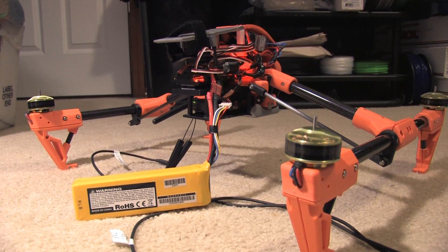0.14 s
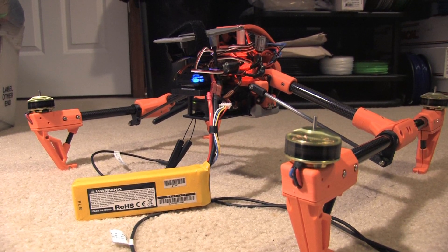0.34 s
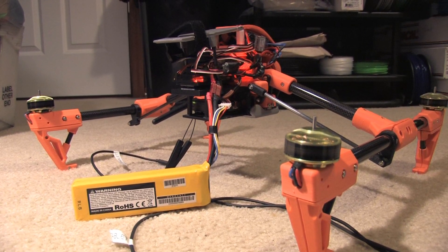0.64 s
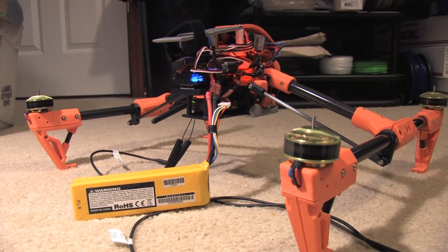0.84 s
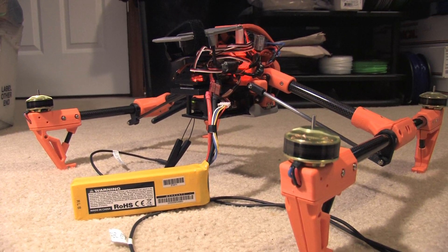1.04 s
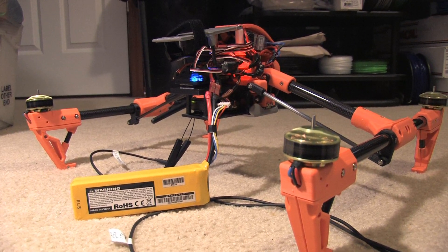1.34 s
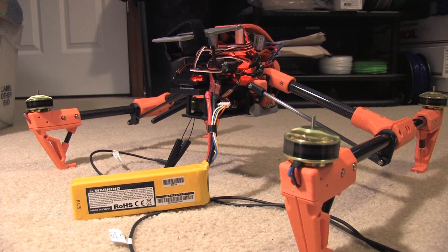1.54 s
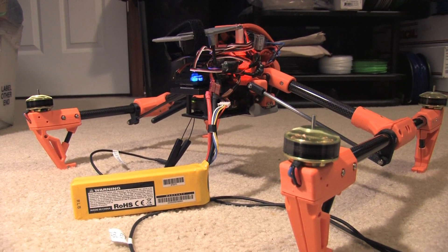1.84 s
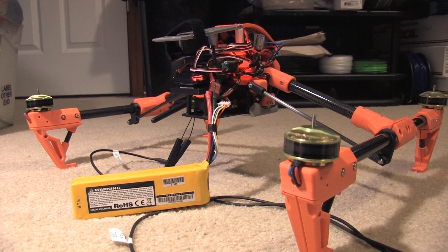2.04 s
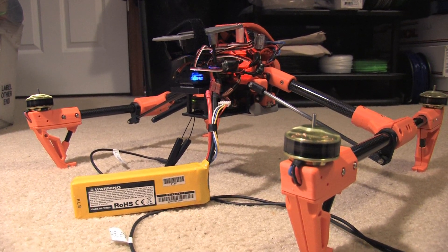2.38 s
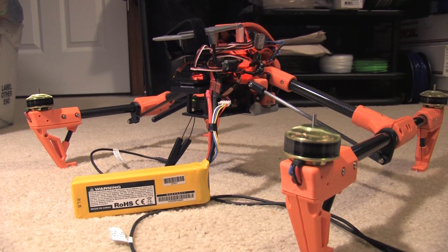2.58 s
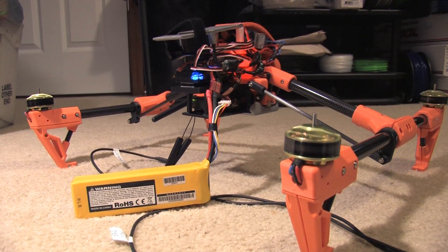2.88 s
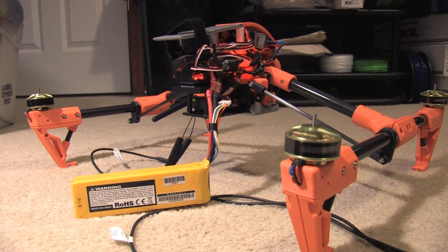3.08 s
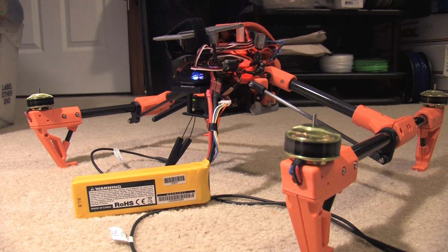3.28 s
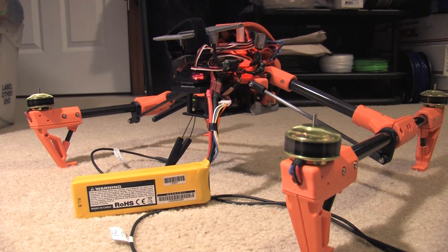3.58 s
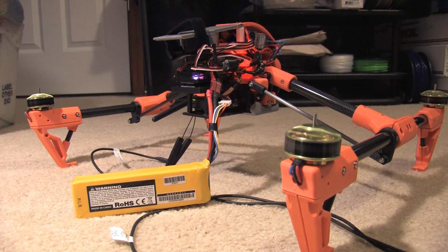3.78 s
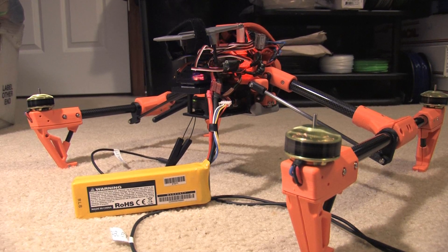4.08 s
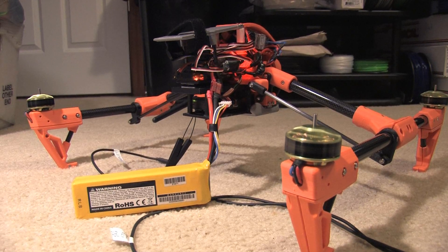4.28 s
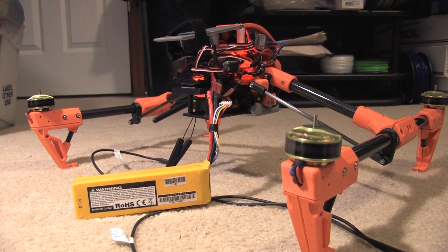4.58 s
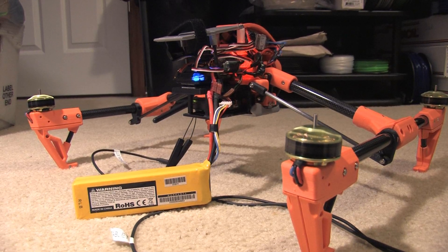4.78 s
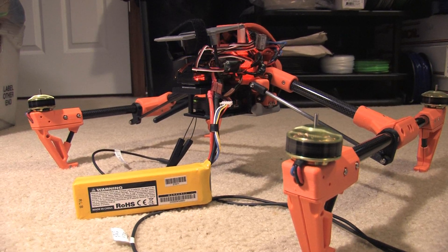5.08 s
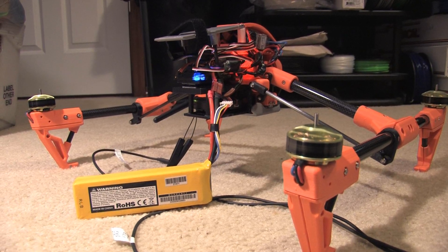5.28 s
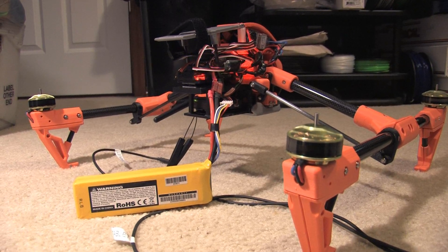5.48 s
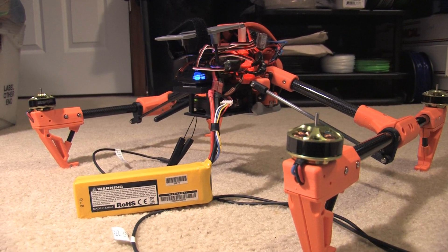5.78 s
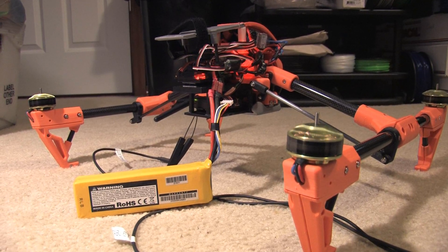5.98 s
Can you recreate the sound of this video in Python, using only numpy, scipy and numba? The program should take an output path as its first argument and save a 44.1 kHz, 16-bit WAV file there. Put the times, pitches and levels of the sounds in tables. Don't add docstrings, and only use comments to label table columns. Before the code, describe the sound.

Several small brushless motors without propellers whine piercingly close to the microphone, sag in pitch, surge back to full speed, then glide down to a stop. Dull room noise and faint hum remain, with a soft thud. A whistling kick spins them up again; a knock comes near the top, they coast down, and another start begins at the very end.

```python
import sys
import numpy as np
from scipy import signal
from scipy.fft import rfft, irfft
from scipy.io import wavfile
from scipy.ndimage import map_coordinates
from numba import njit

SR = 44100
rng = np.random.default_rng(int(sys.argv[2]) if len(sys.argv) > 2 else 0)


def voltage_ratio(decibels):
    exponent = np.asarray(decibels, float) / 20
    return 10 ** exponent


def bounce(signal):
    frames = np.transpose(np.atleast_2d(signal))
    limited = np.clip(frames, -1, 1)
    pcm = np.round(limited * 32767).astype(np.int16)
    wavfile.write(sys.argv[1], SR, pcm)


N = 270333
HOP = 32
TIME = np.arange(N // HOP + 2) * HOP / SR
TOP_HZ = 162
SWITCH_HZ = 9135


def fine(control):
    return np.interp(np.arange(N) / SR, TIME, control)


def walk(rate):
    count = int(N / SR * rate) + 3
    return np.interp(TIME, np.arange(count) / rate, 1.2 * rng.standard_normal(count))


def band(x, low_hz, high_hz):
    sos = signal.butter(4, [low_hz, high_hz], "bandpass", fs=SR, output="sos")
    y = signal.sosfilt(sos, x)
    return y / np.std(y)


def colour(x, points, rings=()):
    hz = np.arange(1, 8194) * SR / 16384
    point_hz, point_db = np.array(points).T
    gain = voltage_ratio(np.interp(np.log(hz), np.log(point_hz), point_db))
    for ring_hz, width_hz, db in rings:
        gain = gain * (1 + (voltage_ratio(db) - 1) / (1 + (2 * (hz - ring_hz) / width_hz) ** 2))
    cepstrum = irfft(np.log(np.abs(gain) + 1e-9))
    cepstrum[1:8192] *= 2
    cepstrum[8193:] = 0
    response = irfft(np.exp(rfft(cepstrum)))
    return signal.fftconvolve(x, response[None], axes=1)[:, :N]


@njit
def add(out, hz, size, left, turn, skew):
    for i in range(out.shape[1]):
        k, part = i // HOP, i % HOP / HOP
        turn += 2 * np.pi * (hz[k] + part * (hz[k + 1] - hz[k])) / SR
        gain = size[k] + part * (size[k + 1] - size[k])
        out[0, i] += gain * left * np.sin(turn + skew)
        out[1, i] += gain / left * np.sin(turn)


# (frequency [Hz], level [dB per Hz])
ROOM = [(15, -24), (25, -10.5), (69, -21), (155, -20.5), (363, -21.5), (430, -25), (489, -23.5), (763, -39),
        (4000, -81), (5200, -103), (8800, -120)]


def room_air(speed):
    shared = rng.standard_normal(N) * np.array([[1], [-1]])
    air = colour(rng.standard_normal((2, N)) + 0.5 * shared, ROOM)
    duck_db = -7 * np.clip((speed - 32) / 10, 0, 1)
    return air * fine(voltage_ratio(-63.5 + duck_db + 1.1 * walk(4.5))) / np.std(air)


# (frequency [Hz], level [dB])
HUM = [(150.7, -72.5), (4797, -105), (5098, -98), (5254, -99), (5399, -94), (5696, -106.5), (6298, -102),
       (6595, -107)]


def hum():
    out = np.zeros((2, N))
    for hz, db in HUM:
        add(out, hz + 0 * TIME, np.sqrt(2) * voltage_ratio(db + 1.0 * walk(27)), 1., 0., .3)
    return out


# (time [s], level [dB], frequency [Hz])
BUMPS = [
    (0.019, -68, 167),
    (0.35, -50, 121),
    (1.449, -67, 38.7),
    (2.917, -48, 43.4),
    (3.999, -34.5, 137.4),
    (5.247, -47.5, 130),
    (5.719, -63, 51.04),
]


def bumps():
    out = np.zeros(N)
    for start_s, db, hz in BUMPS:
        age = np.maximum(np.arange(N) / SR - start_s, 0)
        swell = np.e * age / 0.036 * np.exp(-age / 0.013)
        out += voltage_ratio(db) * swell * np.sin(2 * np.pi * hz * age)
    return out


def floor_shake(speed):
    db = -62 + 4.9 * np.log2(speed / TOP_HZ) + 2 * walk(0.7)
    return fine(voltage_ratio(db)) * band(rng.standard_normal((2, N)), 30, 140)


def surge(speed):
    return np.exp(-((speed - 119.6) / 11.6) ** 2)


# (time [s], speed asked for [Hz])
STICK = [
    [(0, 162), (.041, 162), (.211, 146.8), (.399, 121.8), (.725, 78), (.894, 78.8), (1.014, 101.6),
     (1.024, 162), (1.474, 162), (1.751, 137.4), (1.993, 105.8)],
    [(3.27, 162), (3.865, 162), (4.499, 106.5), (4.687, 81.7)],
    [(6.0, 162), (6.2, 162)],
]


def rotor():
    friction_hz_s, drag_per_s = 56.9, .556
    push_hz_s, kick_hz_s, kick_under_hz, surge_hz_s = 281, 160, 25, 244
    follow_s, rest_hz = .029, 2
    asked = sum(np.interp(TIME, *np.transpose(rows), left=0, right=0) for rows in STICK)
    speed, now = np.empty(len(TIME)), TOP_HZ
    for i, goal in enumerate(asked):
        speed[i] = now
        pull = push_hz_s + kick_hz_s * np.exp(-now / kick_under_hz) + surge_hz_s * surge(now)
        slowing = -friction_hz_s - drag_per_s * now
        climb = min(max((goal - now) / follow_s, slowing), pull)
        now = max(now + climb * HOP / SR, rest_hz)
    return speed


# (time [s], switching whistle level [dB])
STARTS = [
    (3.269, -20.5),
    (6.001, -19),
]


def current(speed):
    hold_hz_s, full_hz_s, ease_off = 208, 320, 6.3
    align_s, align_db, onset_db, onset_s = .031, -7, -12, .005
    climb = np.gradient(speed, TIME)
    hold = hold_hz_s * (speed / TOP_HZ) ** 1.2 * (speed > 70)
    effort = hold + climb * np.where(climb < 0, ease_off, 1)
    db = 20 * np.log10(np.maximum(effort / full_hz_s, 1e-3))
    for start_s, _ in STARTS:
        aligning = (TIME > start_s) * (TIME < start_s + align_s)
        db = db + (align_db + onset_db * np.exp(-np.abs(TIME - start_s) / onset_s)) * aligning
    return db


def switching(speed):
    db = np.full(len(TIME), -120.)
    for start_s, top_db in STARTS:
        rise_db = -12 * np.clip(1 - (TIME - start_s) / 0.062, 0, 1)
        fade_db = 1.627 * np.maximum(speed - 34, 0)
        starting = (TIME > start_s) & (TIME < start_s + .5)
        db = np.where(starting, top_db + rise_db - fade_db, db)
    return db


# (frequency [Hz], level [dB])
WIDE = [(100, 4.5), (400, -5), (2000, -11.5), (4000, -9.5), (7000, -0.5), (15000, -8)]
# (from [Hz], to [Hz], level [dB], knee speed [Hz],
# loss under the knee [dB per octave], buzz at full current [dB])
RUSTLE = [(120, 540, -37, 90, 29, -46.5), (602, 1300, -27.5, 111, 24.5, -42),
          (680, 1870, -55.5, 9, 12, -58.5), (1404, 2600, -33, 39, 20, -39),
          (2798.1, 3900, -33, 65, 38.5, -37.5), (3550, 4114, -49, 53, 24.5, -35.5),
          (4280, 8500, -18, 109.2, 49.5, -35), (7820, 8400, -61.5, 50, 18.5, -55),
          (9650, 11000, -46.5, 130, 37.5, -35.5), (13000, 16000, -26, 138, 49, -36.5)]


def rustle(speed, current_db):
    throb = 1 + 0.24 * np.sin(2 * np.pi * np.cumsum(fine(speed)) / SR)
    grit = voltage_ratio(1.85 * np.repeat(rng.standard_normal(N // 32 + 1), 32)[:N]) * throb
    noise = grit * rng.standard_normal((2, N))
    noise = noise[0] + colour(noise[1:], WIDE) * np.array([[1.3], [-1.3]])
    full_on = np.clip((speed - 155) / 5, 0, 1) * np.minimum(voltage_ratio(current_db + 10), 1)
    buzz_loss_db = np.minimum(.88 * current_db, .5 * current_db)
    out = 0
    for low, high, db, knee, loss_db, buzz_db in RUSTLE:
        spin = voltage_ratio(db - loss_db * np.log2(1 + (knee / speed) ** 2) / 2)
        buzz = voltage_ratio(buzz_db + buzz_loss_db)
        hush_db = (low > 12000) * -12 * full_on
        size = np.hypot(spin, buzz) * voltage_ratio(hush_db + 2.2 * walk(14))
        out = out + fine(size) * band(noise, low, high)
    return out


def bell_db(hz):
    valleys = 17 * np.exp(-((hz - 6200) / 2100) ** 4) + 11 * np.exp(-((hz - 11300) / 1600) ** 4)
    return 15 / (1 + ((hz - 3800) / 260) ** 2) - np.maximum(3500 - hz, 0) / 30 - valleys


# (from [shaft multiple], to [shaft multiple], level at top speed [dB],
# loss [dB per octave of speed])
RACES = [(10.64, 15.5, -49, -3), (22, 45, -43.5, 4), (32.4, 43, -50.5, 3), (45, 95, -59.5, -4),
         (96, 102, -47, 8.5)]


def races(speed):
    place = 2 * np.cumsum(fine(speed)) / TOP_HZ
    stall_db = 30 * np.log10(1 + (9 / speed) ** 2)
    out = 0
    for low, high, db, loss_db in RACES:
        track = band(rng.standard_normal(2 * N), low * TOP_HZ / 2, high * TOP_HZ / 2)
        ring_db = (low > 80) * bell_db((low + high) / 2 * speed)
        size = voltage_ratio(db + loss_db * np.log2(speed / TOP_HZ) - stall_db + ring_db + 2.5 * walk(20))
        out = out + fine(size) * map_coordinates(track, [place], order=3)
    return signal.sosfilt(signal.butter(4, 620, "highpass", fs=SR, output="sos"), out)


# (shaft multiple [-], level at top speed [dB], loss [dB per octave of speed])
COAST = [(1.005, -42, 12), (2.09, -49, 14), (3.12, -41, 15.5), (9.41, -46, 33), (15.2, -44.5, 9.5),
         (16.18, -43.5, 12), (22.6, -53, 3), (49, -51, 3), (12, -40, 4), (13.06, -30.5, 4.5),
         (14.06, -35.5, 4), (26, -42, 8), (27.15, -46, 8), (28, -42, 3.5), (34, -52, -4), (35.9, -44, -2),
         (37.12, -38, .5), (39.5, -54, -2), (42.23, -40, 3.5), (56.6, -45, 6), (98.1, -44, 4),
         (60.5, -48, 13), (70.2, -36, 40), (63, -48, 12), (84.3, -49, 17), (91.5, -54, 18.5),
         (94, -48, 16.5), (104, -47, 21.5), (112, -31, 28), (126, -50, 26)]
# (shaft multiple [-], level [dB], loss [dB per octave of speed])
DRIVEN = [(21, -33, 20), (22, -29, 60), (26, -36, 40), (37.12, -44, 0), (42.2, -33, 2), (49, -43, 0),
          (63, -44, 3), (84, -46, 2)]
# (shaft multiple [-], level [dB])
SURGING = [(14, -39), (21, -33), (28, -29)]
# (switching multiple [-], shaft multiple [-], level [dB])
BEATS = [(1, -14, -10.5), (1, 14, -8.5), (2, -28, -48), (2, -42, -40), (2, -56, -46), (2, -70, -46),
         (2, -84, -46)]


def motor_tones(speed, octaves, current_db, switch_db):
    tones = []
    for k, db, loss_db in COAST:
        tones.append((k * speed, db + loss_db * octaves + (k > 50) * bell_db(k * speed)))
    for k, db, loss_db in DRIVEN:
        tones.append((k * speed, db + current_db + loss_db * octaves))
    for k, db in SURGING:
        tones.append((k * speed, db + current_db + 40 * (surge(speed - 4.0) - 1)))
    for m, k, db in BEATS:
        hz = m * SWITCH_HZ + k * speed
        fade_db = 1.5 * current_db - np.maximum(13000 - hz, 0) / 60
        tones.append((hz, db + (switch_db if m == 1 else fade_db)))
    return tones


# (speed share [-], lateness [s], level [dB], left minus right [dB])
MOTORS = [
    (1, 0, 0, -1),
    (.9935, .03, -10, 1.5),
    (1.004, -.025, -13, -3),
]


def whine(shaft, current_db, switch_db):
    out = np.zeros((2, N))
    for share, late_s, motor_db, pan_db in MOTORS:
        speed = share * np.interp(TIME - late_s, TIME, shaft)
        octaves = np.log2(speed / TOP_HZ)
        speed = speed + .12 * (1 - 2.6 * octaves) * walk(120)
        for hz, db in motor_tones(speed, octaves, current_db, switch_db):
            slow_db = np.maximum(670 - hz, 0) / 7 * (hz.max() > 1000)
            size = voltage_ratio(db - slow_db + motor_db + 3.0 * walk(28)) * (hz < 17000)
            lean, skew, start = rng.standard_normal(size=3) * min(hz.mean() / 5000, 1)
            add(out, hz, np.sqrt(2) * size, voltage_ratio(pan_db / 2 + 1.5 * lean), 9 * start, skew)
    add(out, SWITCH_HZ + 0 * TIME, voltage_ratio(switch_db), 1.1, 0., .8)
    return out


# (frequency [Hz], level [dB])
FRAME = [(60, -35), (200, -18), (500, -11), (800, -18.5), (1900, -3.5), (2600, -5.5), (3800, -8),
         (5000, -10.5), (7000, -9.5), (9000, -6), (10500, -18), (12300, -5.5), (14000, -7), (15800, -17.5)]
# (frequency [Hz], width [Hz], level over the frame [dB])
RINGS = [(788.4, 144, 2.5), (1804, 330, 1.5), (3547, 44, 9.5), (3821, 156, 14), (5880, 600, 0),
         (8160, 270, 8.5), (8957, 66, 13), (14341, 1000, 11.5)]


def scene():
    speed = rotor()
    current_db = current(speed)
    room = room_air(speed) + hum() + bumps() + floor_shake(speed)
    bare = rustle(speed, current_db) + races(speed) + whine(speed, current_db, switching(speed))
    motors = colour(bare, FRAME, RINGS)
    motors[0] = np.roll(motors[0], shift=1) * voltage_ratio(-1.51)
    return room + motors


def low_pass(x):
    return signal.sosfilt(signal.butter(12, 16460, fs=SR, output="sos"), x)


def record(dry):
    return low_pass(dry)


dry = scene()
out = record(dry)
bounce(out)
```